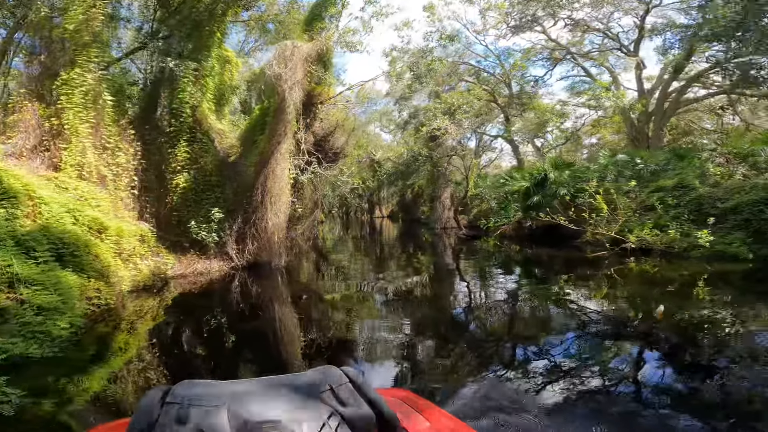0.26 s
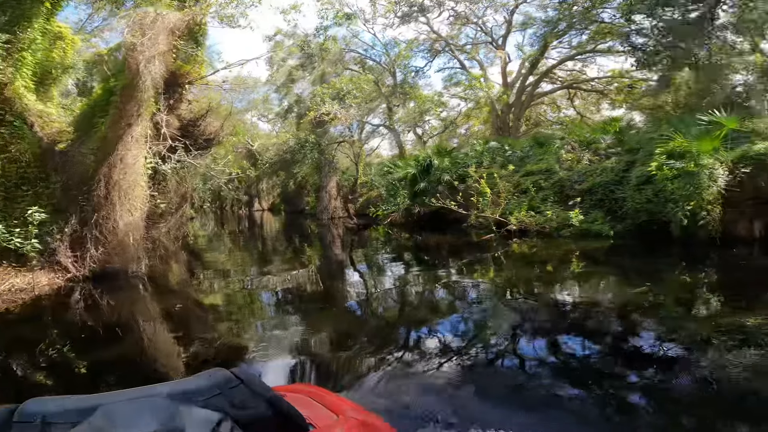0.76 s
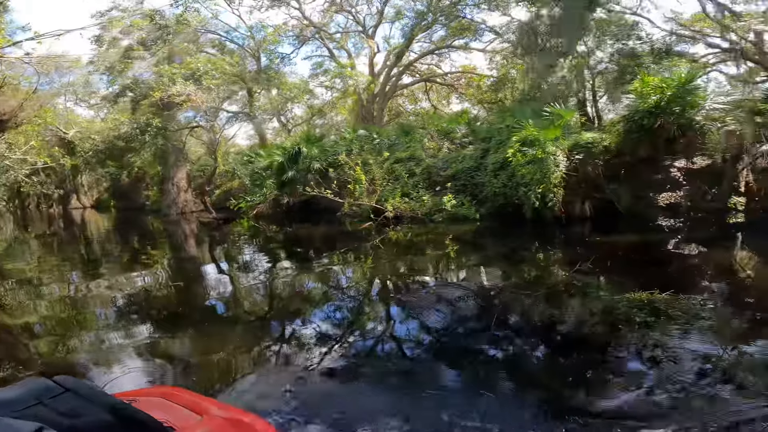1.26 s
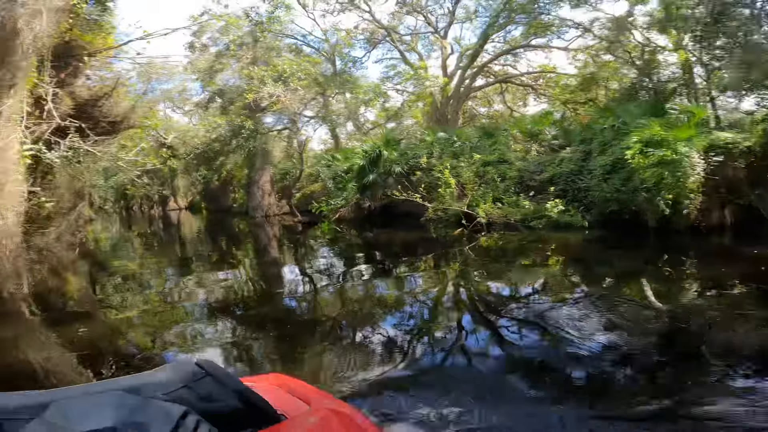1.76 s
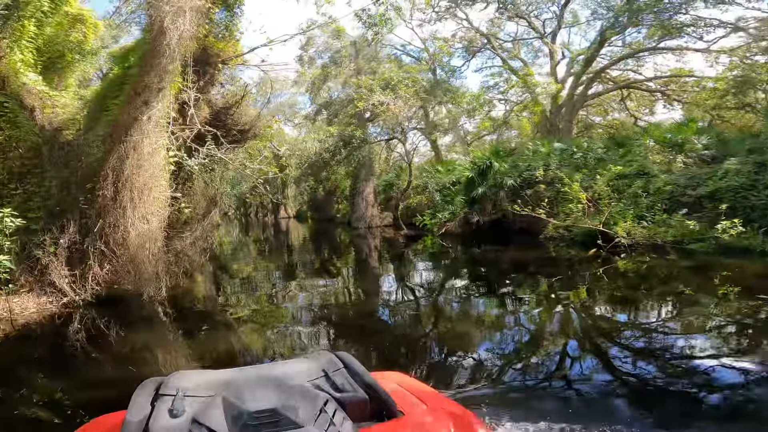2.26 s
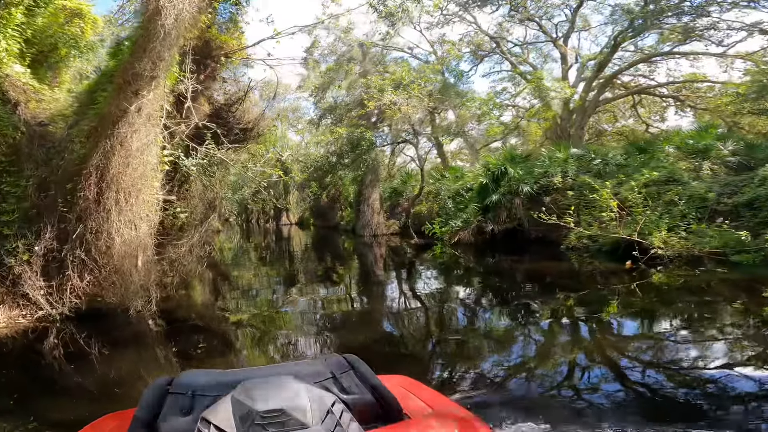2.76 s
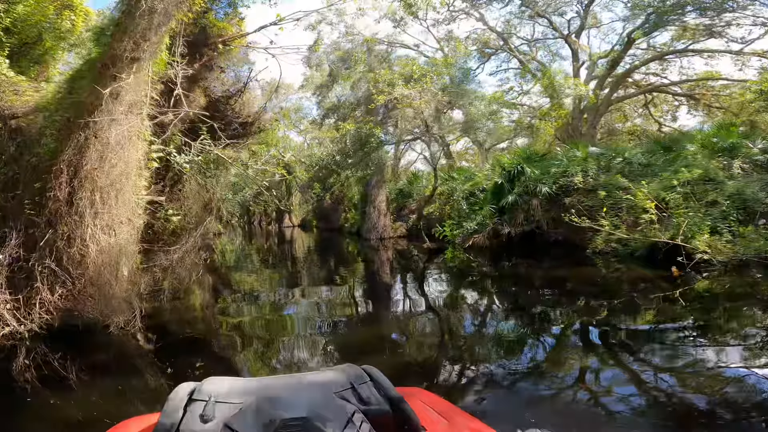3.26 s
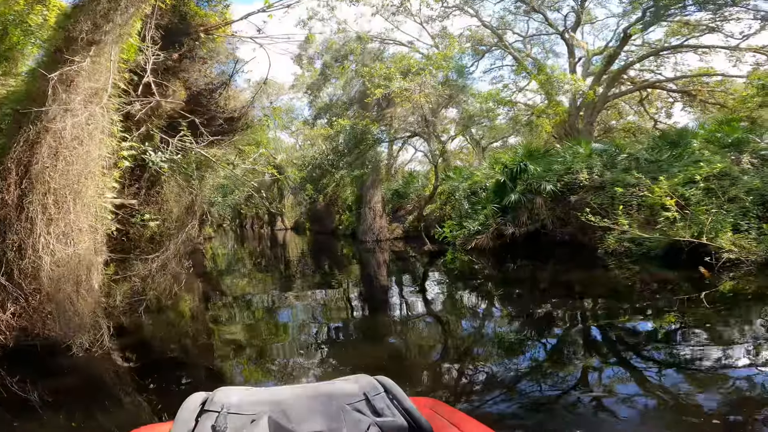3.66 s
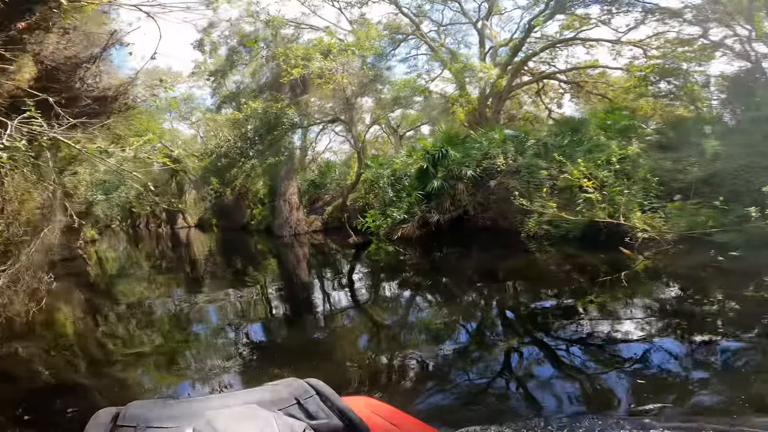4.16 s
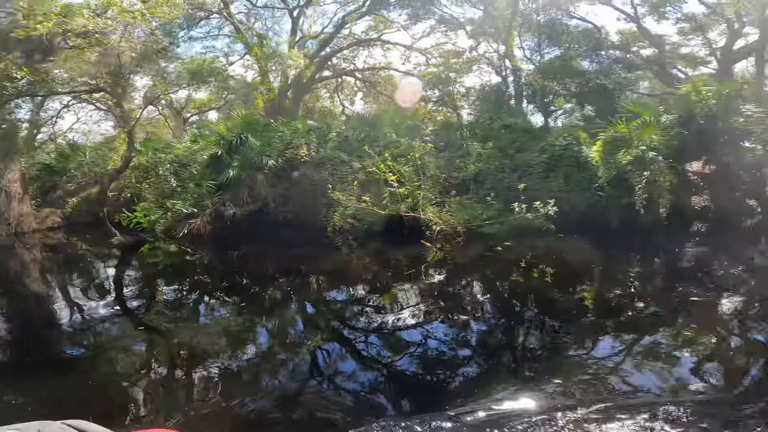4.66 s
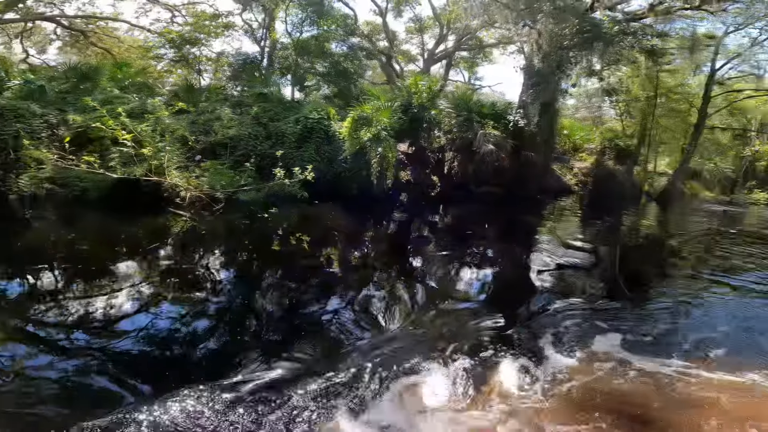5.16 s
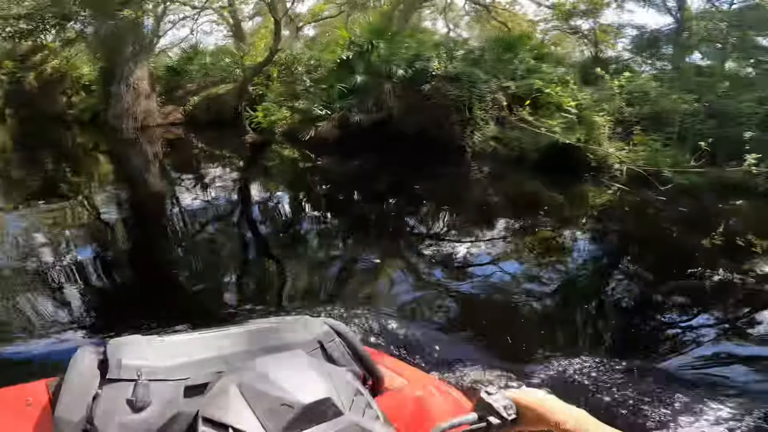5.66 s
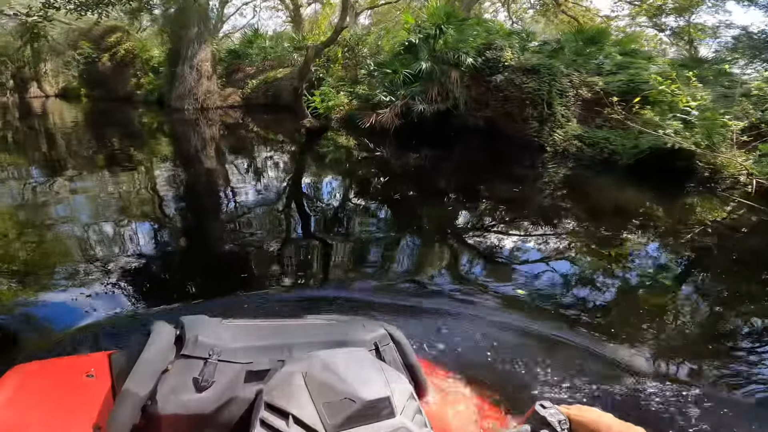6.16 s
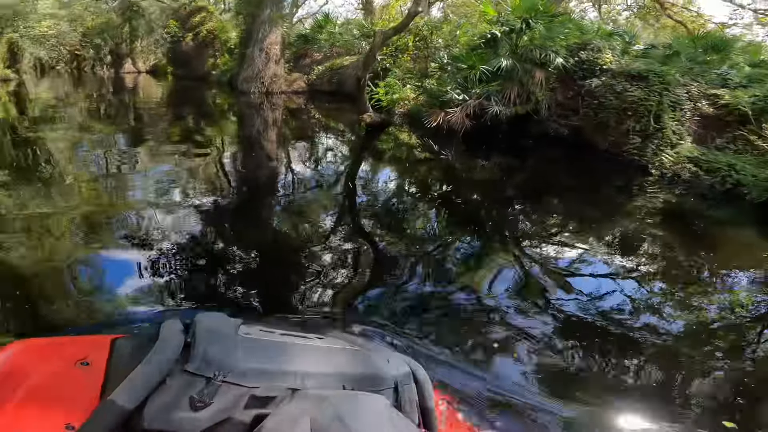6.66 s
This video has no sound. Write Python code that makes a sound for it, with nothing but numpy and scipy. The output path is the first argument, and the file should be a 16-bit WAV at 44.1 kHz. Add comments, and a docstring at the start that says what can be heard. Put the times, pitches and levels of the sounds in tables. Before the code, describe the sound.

A quad bike wades through water outdoors, heard close from its seat. Its chugging idle swells into a loud, rough pull, with churning water, fizzing spray and a few plops. After stumbling and misfiring, the engine sinks to a low, muffled hum. Two plastic clacks and a soft thud come in the lull. Then the throttle opens again and a bubbling bow wave builds, with tiny ticks of landing drops.

```python
"""A V-twin quad bike wades through water, heard from the rider's seat. It idles in a narrow image, each
firing ringing the exhaust pipe. At 1 s it pulls: the image widens, the exhaust barks, panels sing and
water churns and plops. From 2.5 s it bogs down and misfires, then drops back to idle as the water muffles
the silencer. In the lull the bodywork clacks twice, the second time over a thud of the hull. From 5.7 s
it pulls again, pushing a bow wave that bubbles and sprays around the wheels."""
import sys
import numpy as np
from scipy import signal
from scipy.fft import rfft, irfft, next_fast_len
from scipy.io import wavfile
from scipy.ndimage import map_coordinates

SR = 44100
rng = np.random.default_rng(int(sys.argv[2]) if len(sys.argv) > 2 else 0)


def log_audio(samples):
    """Write samples as a 16-bit WAV file to the path given in sys.argv[1]."""
    # one column per channel
    frames = np.atleast_2d(samples).T
    # limit to full scale, then quantise
    limited = np.clip(frames, -1, 1)
    pcm = np.round(limited * 32767).astype(np.int16)
    wavfile.write(sys.argv[1], SR, pcm)


N = 304290

# thin high hiss, its tone: freq_hz, gain_db
HISS_TONE = [(9000, -55), (11000, -26), (11500, -11), (12200, 0), (13100, -8), (14200, -6), (15700, -7)]
# fader ride of the hiss: time_s, level_db
HISS_RIDE = [(0.0, -67), (4.59, -76.5), (6.05, -69), (6.61, -70.5), (6.9, -64)]
# drops striking close by: start_s, level_db
DROP_HITS = [(0.4866, -44.5), (5.7962, -43.5), (6.0658, -34), (6.1844, -33), (6.5168, -28), (6.5986, -36)]
# valve rustle with a faint high sizzle near 5 kHz: freq_hz, gain_db
RUSTLE_SIZZLE_TONE = [(350, -11.5), (700, -28), (1040, -31.5), (1130, -9.5), (1250, -15.5), (1440, 0.5),
                      (1600, -8.5), (1850, -5.5), (2050, -22), (3200, -29.5), (5300, -35), (6500, -58)]
# narrow resonances swelling in turn, singing panels and two brief splashes (first and last row):
# centre_s, length_s, pitch_hz, width_hz, level_db
NARROW_SWELLS = [(1.263, 0.16, 4560, 606, -64), (1.542, 0.65, 1033, 90, -48.5),
                 (2.449, 1.72, 565.3, 21.85, -43), (3.402, 0.91, 849, 45.4, -42.5),
                 (3.942, 0.63, 893, 54.6, -42.5), (3.415, 0.37, 1668, 55, -43.5),
                 (3.953, 0.47, 1516, 61, -46.5), (4.677, 0.51, 1088, 70, -58.5),
                 (6.85, 0.55, 1530, 150, -44.5)]
# bodywork contacts: start_s, level_db, decay_s (to -60 dB)
CLACK_HITS = [(5.414, -39, .03), (5.626, -49, .07), (5.638, -44, .09), (5.653, -45, .05),
              (5.663, -37.5, .035)]
# resonances of a plastic panel: pitch_hz, width_hz, gain_db
PANEL_MODES = [(880, 120, -5.5), (1450, 27, 8.5), (1740, 230, -1.5), (2080, 210, -7), (2680, 280, -15)]
# water plopping against the hull: start_s, level_db, pitch_hz
PLOP_HITS = [(1.411, -28, 1107), (1.653, -27.5, 1039), (1.97, -25, 658), (3.297, -23, 655),
             (4.361, -32, 710)]
# fizz of flung spray: freq_hz, gain_db
SPRAY_TONE = [(1290, -19.5), (2200, -2), (3600, -5), (5040, -12), (7650, -16), (9880, -22.5),
              (11000, -34.5), (14300, -57.5), (22000, -120)]
# mechanical clatter of the engine: freq_hz, gain_db
CLATTER_TONE = [(180, -25), (300, 4), (367, 0), (420, -12.5), (567, -5), (655, -8.5), (883, -9.5),
                (1180, -8), (1290, -17.5), (1530, -9), (2160, -20.5), (3000, -28.5), (3900, -59),
                (6600, -120)]
# wash of the bow wave: freq_hz, gain_db
WASH_TONE = [(76, -17.5), (130, -10.5), (392, -8), (717, -11.5), (828, -16), (920, -7.5), (995, -13.5),
             (1150, -10), (1500, -13), (2220, -25), (3000, -37.5), (3900, -67), (6600, -120)]
# engine speed: time_s, cycle_rate_hz
ENGINE_SPEED = [(0.0, 26.04), (0.55, 25.75), (1.2, 26.58), (1.5, 24.9), (2.2, 25.42), (2.9, 25.76),
                (3.2, 22.32), (3.4, 20.69), (3.65, 23.84), (3.95, 24.75), (4.36, 23.97), (4.85, 26.39),
                (6.2, 25.74), (6.9, 29.61)]
# the silencer booms in the shallows and is muffled once it dips under: time_s, thump_db, exhaust_db
ENGINE_RIDE = [(0.05, -39.5, -29), (0.86, -32, -30), (1.05, -40, -33), (1.58, -37, -21.5),
               (2.83, -35.5, -21), (3.31, -40.5, -23.5), (3.97, -37, -19.5), (4.35, -43, -27),
               (4.71, -48.5, -44), (5.52, -40, -43.5), (5.94, -45.5, -42.5), (6.39, -34.5, -37),
               (6.85, -34.5, -36.5)]
# bursts of throttle: open_s, shut_s, churn_db, churn_rise_s, spray_db, bark_db, bark_rise_s
THROTTLE = [(.93, 4.015, -33, 1.02, -50.5, -30.5, 1.06), (5.678, 6.9, -30, 1.55, -51, -41, 0.29)]
# misfires, weakening any firing that falls close by: time_s, dip_db
MISFIRE_DIPS = [(2.565, -7), (2.685, -7), (3.17, -5), (3.35, -6), (3.5, -4), (3.635, -4), (4.125, -7),
                (4.26, -5), (4.5, -8), (4.71, -7)]
# boom of the exhaust pipe and silencer: freq_hz, gain_db
PIPE_TONE = [(30, -20), (70, -25.5), (84, 4), (104, 8.5), (126, 6.5), (152, 6), (178, -4), (205, -14),
             (260, -23), (400, -42.5), (900, -97.5)]
# hard edge of a loaded firing: freq_hz, gain_db
BARK_TONE = [(90, -20.5), (170, -7), (205, 1), (245, 3), (290, -7), (350, -12.5), (450, -22), (600, -18.5),
             (1200, -30), (2500, -64.5)]
# stereo balance: freq_hz, left_minus_right_db
STEREO_LEAN = [(60, 4), (110, 7.5), (200, -0.5), (380, -2.0), (700, -2.5), (1290, 1.5), (2380, 3.5),
               (4400, 8), (8120, 13.5), (15000, 9)]
# phase between the sides: freq_hz, left_lead_rad
STEREO_LEAD = [(100, -0.39), (340, -1.42), (780, -1.4), (1300, -1.08), (1890, -0.63), (2300, -0.13),
               (4300, -0.11), (6000, 0.25)]
# how alike the sides are in water and clatter: freq_hz, correlation
STEREO_LIKENESS = [(100, 0.77), (300, 0.9), (700, 1), (1400, 0.92), (3100, 0.98), (5000, 0.33), (7000, 0.4),
                   (12000, .1)]

IDLE_RATE_HZ, IDLE_DB = 26, -29  # cycle rate and exhaust level at a dry idle
IDLE_BARK_DB, IDLE_CLATTER_DB, IDLE_FIZZ_DB, RUSTLE_DB = -50.5, -58, -76.5, -55  # beds at a dry idle
BARK_FOLLOW, CLATTER_FOLLOW, RUSTLE_FOLLOW = .55, .75, 0.48  # dB these beds move per dB of exhaust
COAST_S, COAST_POWER = 1.265, 2.78  # time to stop after the throttle shuts; curve of the fade
SINK_S, SUNK_S = 4.1, 6.9  # the machine settles into deep water between these times
LUG_DB_PER_HZ, FLING_DB_PER_HZ = 0.53, 1.88  # more bark below idle speed, more spray above it
TURBULENT_DRY_DB, TURBULENT_SUNK_DB = -14.5, -1.5  # gas noise against the clean pulses in the pipe
SCATTER_DB, SCATTER_SUNK_DB, SCATTER_LUG_DB_PER_HZ = 0.62, 2.5, 0.29  # unevenness of the firings
KICK_AFTER_S, KICK_SHARE = .075, 0.32  # kick after a misfire: its delay, its share of the lost dB
WIDE_AT = 0.078  # share of the throttle envelope at which the image is fully open
TOP_HZ = 15750


def amp(db):
    """Decibels to gain."""
    return 10 ** (np.asarray(db) / 20)


def unit(x):
    """Scale so that the mean of the channels has rms 1."""
    return x / np.sqrt(np.mean(np.atleast_2d(x).mean(0) ** 2) + 1e-20)


def clock():
    """The time of each sample in seconds."""
    return np.arange(N) / SR


def along(points, hz):
    """Read (freq_hz, value) points on a log frequency axis."""
    freqs, values = np.transpose(points)
    return np.interp(np.log(hz + 1), np.log(freqs + 1), values)


def curves(rows):
    """One automation curve for each column after the time."""
    times, *columns = np.transpose(rows)
    return [np.interp(clock(), times, column) for column in columns]


def wobble(rate_hz):
    """A smooth random curve with rate_hz knots a second."""
    return map_coordinates(rng.standard_normal(int(N * rate_hz / SR) + 4), [clock() * rate_hz])


def noise():
    """White stereo noise."""
    return rng.standard_normal((2, N))


def filtered(x, response):
    """Shape x with a complex frequency response."""
    size = next_fast_len(N + SR // 2)
    return irfft(rfft(x, size) * response(np.fft.rfftfreq(size, 1 / SR)), size)[..., :N]


def coloured(x, tone):
    """Minimum-phase EQ through (freq_hz, gain_db) points."""
    size = 8192
    cepstrum = irfft(np.log(amp(along(tone, np.fft.rfftfreq(size, 1 / SR)))))
    cepstrum[1:size // 2] *= 2
    cepstrum[size // 2 + 1:] = 0
    ring = irfft(np.exp(rfft(cepstrum)))
    return signal.oaconvolve(x, ring if x.ndim == 1 else ring[None], axes=-1)[..., :N]


def resonant(x, modes):
    """Ring (pitch_hz, width_hz, gain_db) resonances of alternating polarity."""
    band = lambda hz, pitch, width: 1j * hz * width / (pitch ** 2 - hz ** 2 + 1j * hz * width)
    return filtered(x, lambda hz: sum((-1) ** k * amp(db) * band(hz, pitch, width)
                                      for k, (pitch, width, db) in enumerate(modes)))


def paired(two):
    """Blend two unrelated signals into a partly alike left and right."""
    turn = lambda hz: np.arccos(np.clip(along(STEREO_LIKENESS, hz), -1, 1)) / 2
    mid, side = filtered(two, lambda hz: np.array([np.cos(turn(hz)), np.sin(turn(hz))]))
    return np.array([mid + side, mid - side])


def pull(open_s, shut_s, rise_s, power=COAST_POWER):
    """Envelope of one burst of throttle: it builds with a lag, then coasts to a stop."""
    build = 1 - np.exp(-np.maximum(clock() - open_s, 0) / rise_s)
    coast = np.clip(1 - (clock() - shut_s) / COAST_S, 0, 1)
    return build * coast ** power


def puffs(pulses, decay_s):
    """An envelope that jumps at each firing and dies away."""
    return unit(signal.lfilter([1], [1, -np.exp(-1 / (SR * decay_s))], pulses))


def lugging_hz():
    """How far the load drags the cycle rate below idle."""
    return np.maximum(IDLE_RATE_HZ - curves(ENGINE_SPEED)[0], 0)


def depth():
    """0 in the shallows, 1 in deep water."""
    return np.clip((clock() - SINK_S) / (SUNK_S - SINK_S), 0, 1)


def effort_db():
    """The exhaust level over that of a dry idle."""
    return curves(ENGINE_RIDE)[1] - IDLE_DB


def turbulence():
    """The exhaust's share of gas noise, growing with depth."""
    return amp(TURBULENT_DRY_DB + (TURBULENT_SUNK_DB - TURBULENT_DRY_DB) * depth())


def hiss():
    """A thin, flickering hiss at the top of the mix."""
    level_db, = curves(HISS_RIDE)
    return amp(level_db + 2.2) * unit(coloured(noise() * amp(wobble(70)), HISS_TONE))


def drops():
    """Flung water lands in tiny bright ticks."""
    t = clock()
    ticks = sum(amp(db - 14 - 60 * np.abs(t - s) / 0.0075) * (t >= s) for s, db in DROP_HITS)
    return ticks * unit(coloured(noise(), [(2000, -22), (6000, -10.5), (12000, -1), (16000, 0)]))


def rustle_and_sizzle(cycle):
    """Valve rustle with a faint high sizzle, pulsing lightly four times a cycle."""
    taps = (1 + 0.13 * np.cos(8 * np.pi * cycle)) * amp(1.1 * wobble(60))
    rustle = unit(coloured(taps * rng.standard_normal(N), RUSTLE_SIZZLE_TONE))
    return amp(RUSTLE_DB + RUSTLE_FOLLOW * effort_db()) * rustle


def narrow_swells(pulses):
    """Firings and noise ring narrow resonances that swell in turn: singing panels and two splashes."""
    shake = unit(pulses) + 0.89 * rng.standard_normal(N)
    swell = lambda centre_s, length_s: np.exp(-(2 * (clock() - centre_s) / length_s) ** 2)
    peak = lambda x, hz, width: signal.lfilter(*signal.iirpeak(hz, hz / width, SR), x)
    ring = lambda hz, width: unit(peak(peak(shake, hz, width), hz, 4 * width))
    return sum(amp(db) * swell(s, length) * ring(hz, width) for s, length, hz, width, db in NARROW_SWELLS)


def hull_thud(start_s=5.64, level_db=-30, pitch_hz=120, decay_s=.3):
    """A soft bump sets the hull booming for a moment."""
    age = np.maximum(clock() - start_s, 0)
    attack = 1 - np.exp(-age / .008)
    return amp(level_db - 60 * age / decay_s) * attack * np.sin(2 * np.pi * pitch_hz * age)


def bodywork_clacks():
    """Short rattling contacts ring a dull plastic panel."""
    t = clock()
    blows = sum(amp(db - 60 * np.abs(t - s) / decay) * (t >= s) for s, db, decay in CLACK_HITS)
    panel = lambda x: coloured(resonant(x, PANEL_MODES), [(2900, 8), (3600, 1), (6000, -19), (12000, -56)])
    rattle = rng.standard_normal(N)
    return panel(blows * rattle) / np.std(panel(rattle))


def plops():
    """Single large bubbles ring briefly and rise in pitch."""
    total = np.zeros(N)
    for start_s, db, hz in PLOP_HITS:
        age = np.maximum(clock() - start_s, 0)
        total += amp(db - 60 * age / 0.041) * np.sin(2 * np.pi * hz * age * (1 + 4 * age))
    return total


def bubbles(count, centre_hz, cycles, spread_db):
    """A cloud of damped tones that rise in pitch, scattered in time and pan."""
    start, pan = rng.integers(0, N, count), rng.uniform(0, np.pi, count)
    pitch_hz = np.clip(centre_hz * 2 ** rng.standard_normal((count, 1)), 200, 12000)
    gain = amp(spread_db * np.minimum(rng.exponential(size=(count, 1)), 4))
    offset = np.arange(int(SR * np.clip(2 * cycles / centre_hz, .002, .016)))
    age = pitch_hz * offset / SR / cycles  # in bubble lifetimes
    chirp = 1 + 0.054 * np.minimum(age, 2)
    grains = gain * np.exp(-2 * age) * np.sin(2 * np.pi * cycles * age * chirp)
    spots = (start[:, None] + offset).ravel()
    return unit(np.array([np.bincount(spots, (grains * side[:, None]).ravel(), N + SR)[:N]
                          for side in (np.cos(pan), np.sin(pan))]))


def spray(rise_s=0.49):
    """The wheels fling a fizz of noise and fine bubbles, lagging the throttle."""
    flung = sum(amp(db) * pull(opens, shuts, rise_s) for opens, shuts, _, _, db, *_ in THROTTLE)
    racing_hz = np.maximum(curves(ENGINE_SPEED)[0] - IDLE_RATE_HZ, 0)
    idle_gain = amp(IDLE_FIZZ_DB + RUSTLE_FOLLOW * effort_db())
    gain = np.hypot(flung * amp(FLING_DB_PER_HZ * racing_hz), idle_gain)
    fizz = unit(noise()) * amp(1.1 * wobble(25))
    fizz += amp(-10) * bubbles(count=5000, centre_hz=4780, cycles=3.1, spread_db=3)
    return amp(-2.5) * gain * unit(coloured(paired(fizz), SPRAY_TONE))


def clatter_and_wash(pulses):
    """Over gurgling bubbles, throbbing engine clatter crossfades with depth into the bow wave."""
    churned = sum(amp(db) * pull(opens, shuts, rise) for opens, shuts, db, rise, *_ in THROTTLE)
    gain = np.hypot(churned, amp(IDLE_CLATTER_DB + CLATTER_FOLLOW * effort_db()))
    froth = paired(bubbles(count=2500, centre_hz=943, cycles=6.5, spread_db=1.9))
    gurgle = unit(coloured(froth, [(200, -7), (500, -5.5), (1600, -9.5), (2500, -18), (8000, -19)]))
    rush = paired(noise())
    throb = 1.5 + puffs(pulses, decay_s=0.045)
    clatter = unit(coloured(rush * throb * amp(0.72 * wobble(45)), CLATTER_TONE))
    wash = unit(coloured(rush * amp(1.4 * wobble(30)), WASH_TONE))
    return gain * (amp(-2) * (1 - depth()) * clatter + amp(1.5) * depth() * wash + amp(-6.5) * gurgle)


def firings(cycle, first=.765, gap=.402):
    """One pulse per cylinder, gap cycles apart; unburnt fuel from a misfire kicks a later firing."""
    whole = np.arange(-1, int(cycle[-1]) + 1)
    turns = np.concatenate([whole + first, whole + first + gap])
    at = np.searchsorted(cycle, turns[(turns > 0) & (turns < cycle[-1])])
    near = lambda s: np.exp(-((at / SR - s) / 0.018) ** 2)
    stumble_db = sum(db * (near(s) - KICK_SHARE * near(s + KICK_AFTER_S)) for s, db in MISFIRE_DIPS)
    spread_db = SCATTER_DB + SCATTER_SUNK_DB * depth() + SCATTER_LUG_DB_PER_HZ * lugging_hz()
    scatter_db = spread_db * rng.standard_normal(N)
    return np.bincount(at, amp(stumble_db + scatter_db[at]), N)


def engine_thump(cycle):
    """The engine rocks the machine at its two lowest orders, over a turbulent rumble."""
    level_db, _ = curves(ENGINE_RIDE)
    rumble_tone = [(12, -13), (30, 2.5), (55, 12), (85, 7.5), (140, -7.5), (300, -78.5)]
    rumble = unit(coloured(rng.standard_normal(N), rumble_tone))
    orders = 0.63 * np.cos(2 * np.pi * (cycle - .45)) + np.cos(4 * np.pi * (cycle - .28))
    rocking = unit(orders) * amp(0.67 * wobble(6.8))
    share = 0.94 * np.sqrt(turbulence())
    return amp(level_db + 0.5) * (rocking + share * rumble) / np.hypot(1, share)


def exhaust(pulses):
    """Firings and their puffs of turbulent gas ring the pipe and bark under load."""
    _, pipe_db = curves(ENGINE_RIDE)
    load = sum(amp(db) * pull(opens, shuts, rise) for opens, shuts, *_, db, rise in THROTTLE)
    idle_gain = amp(IDLE_BARK_DB + BARK_FOLLOW * effort_db())
    bark_gain = np.hypot(load * amp(LUG_DB_PER_HZ * lugging_hz()), idle_gain)
    gas = puffs(pulses, decay_s=.007) * rng.standard_normal(N)

    def voiced(tone, share):
        """Clean pulses and gas through one EQ, blended at constant power."""
        return (unit(coloured(pulses, tone)) + share * unit(coloured(gas, tone))) / np.hypot(1, share)

    pipe = voiced(PIPE_TONE, turbulence())
    bark = voiced(BARK_TONE, 3.16 * turbulence())
    return amp(pipe_db + 0.74) * pipe + bark_gain * bark


def scene():
    """Bass and treble lean left; all but the hiss and drops close to mono while the engine idles and widen as
    the throttle opens."""
    cycle = np.cumsum(curves(ENGINE_SPEED)[0]) / SR
    pulses = firings(cycle)
    rustle, air = rustle_and_sizzle(cycle), hiss()
    mix = rustle + exhaust(pulses) + engine_thump(cycle) + clatter_and_wash(pulses) + spray()
    mix += narrow_swells(pulses) + plops() + bodywork_clacks() + hull_thud()
    lean = lambda hz: 2 / (1 + amp(np.outer([-1, 1], along(STEREO_LEAN, hz))))
    # the two sides hear the machine out of step
    lead = lambda hz: 1 + 1j * np.outer([1, -1], np.tan(along(STEREO_LEAD, hz) / 2))
    left, right = filtered(mix, lambda hz: lean(hz) * lead(hz))
    pulling = sum(pull(opens, shuts, rise, power=1) for opens, shuts, _, rise, *_ in THROTTLE)
    width = np.clip(pulling / WIDE_AT, 0, 1)
    mid, side = (left + right) / 2, width * (left - right) / 2
    return np.array([mid + side, mid - side]) + filtered(air + drops(), lean)


def record(dry):
    """A brick-wall low-pass trims the very top."""
    return filtered(dry, lambda hz: hz < TOP_HZ)


dry = scene()
out = record(dry)
log_audio(out)
```